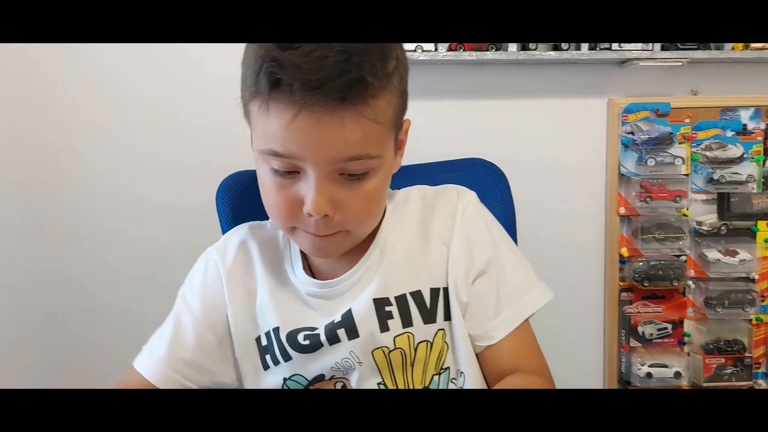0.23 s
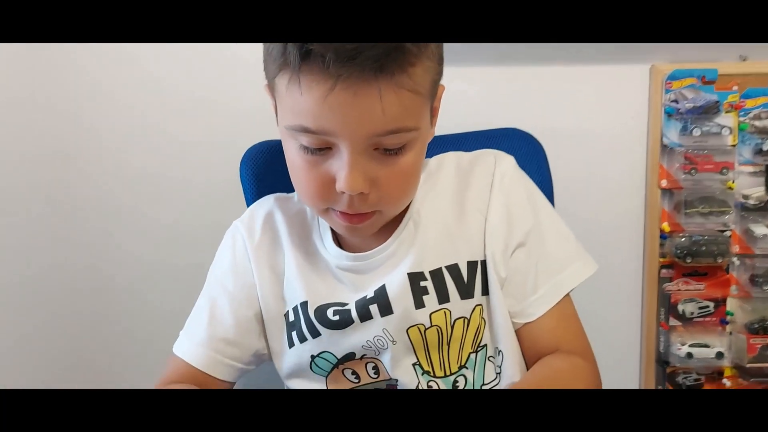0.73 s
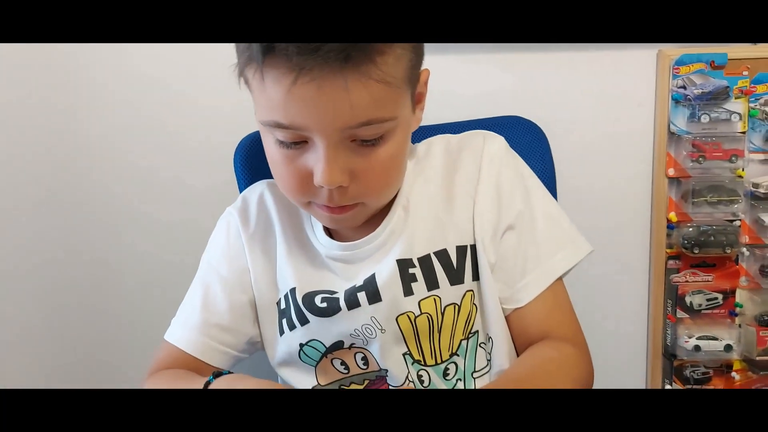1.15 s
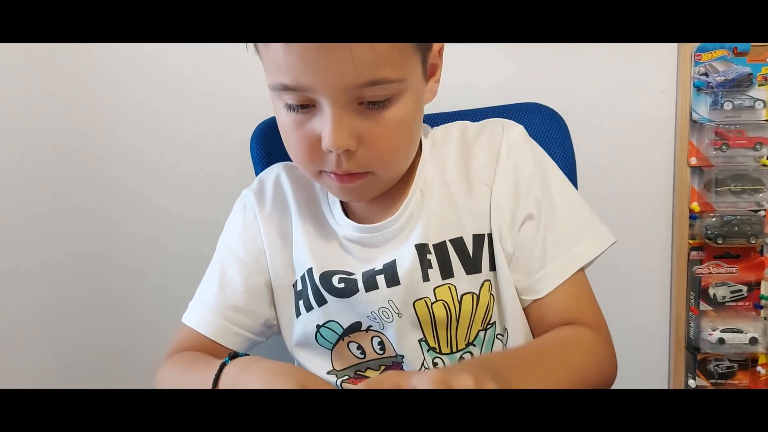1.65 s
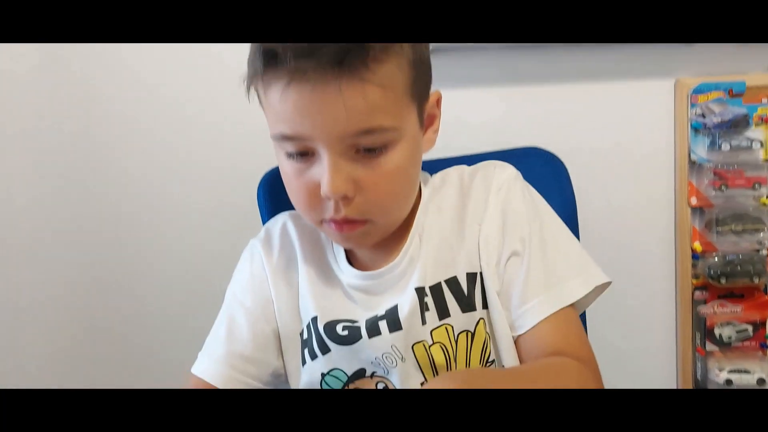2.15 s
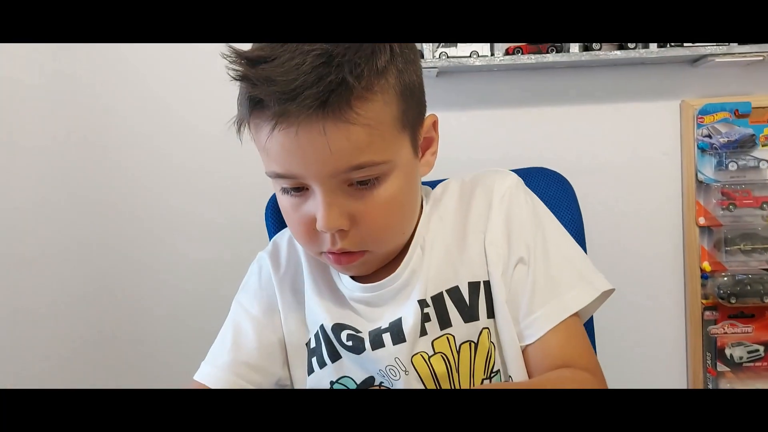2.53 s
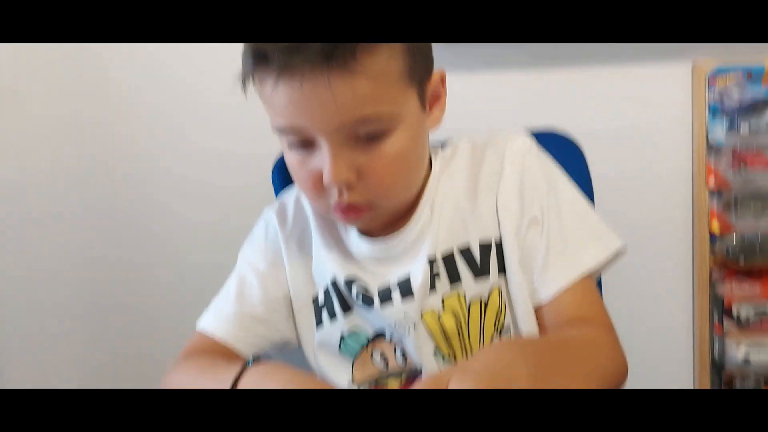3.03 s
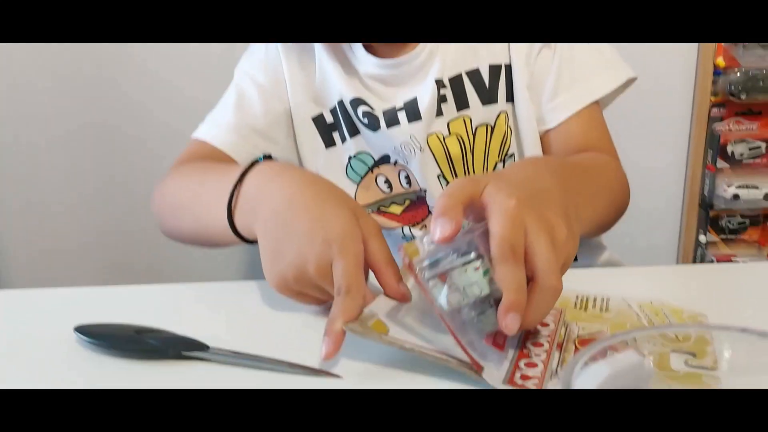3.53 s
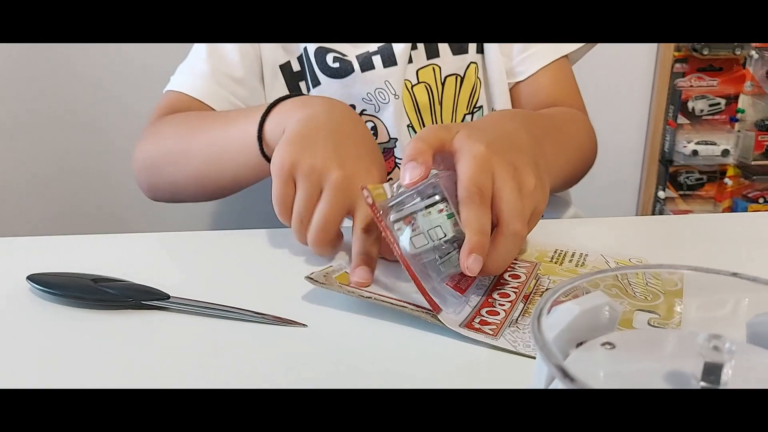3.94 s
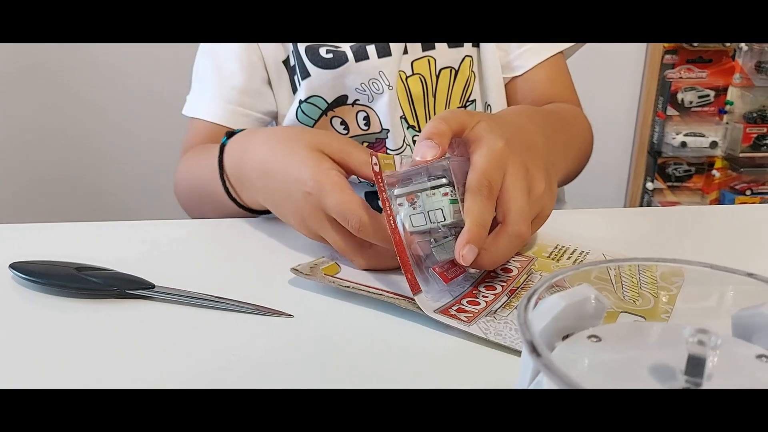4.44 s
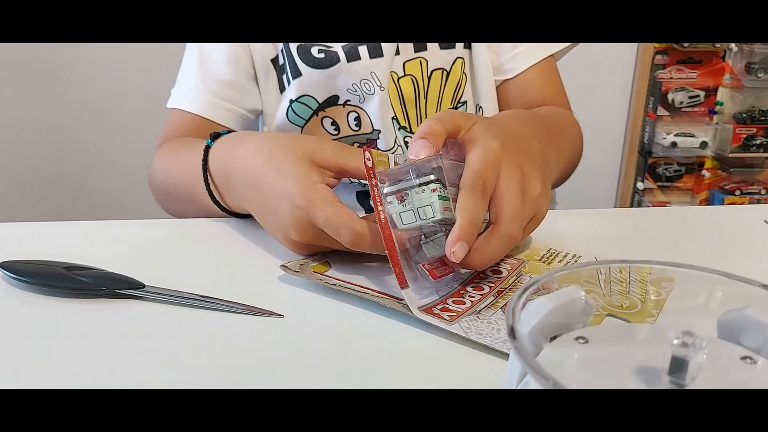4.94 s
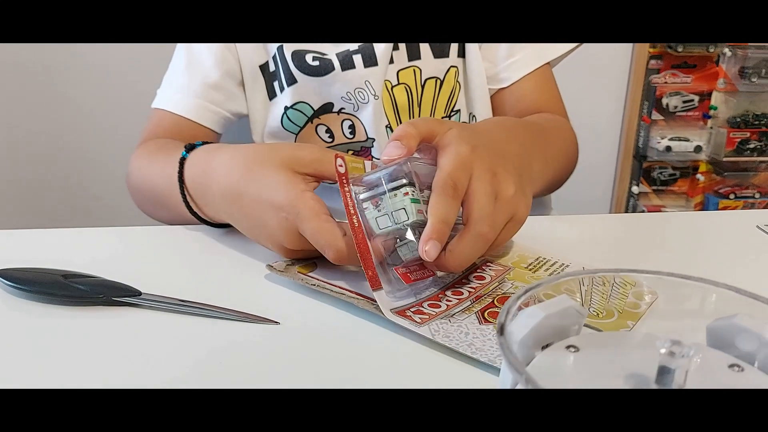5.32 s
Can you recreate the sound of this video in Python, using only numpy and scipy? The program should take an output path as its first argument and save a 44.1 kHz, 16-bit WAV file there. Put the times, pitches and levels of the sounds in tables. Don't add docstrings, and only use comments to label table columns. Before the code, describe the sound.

A brief metallic clatter on a tabletop gives way to irregular hollow plastic snaps over fine creaking and fizzing, close up in a quiet room.

```python
import sys
import numpy as np
from scipy import signal
from scipy.fft import rfft, irfft, next_fast_len
from scipy.io import wavfile

SR = 44100
rng = np.random.default_rng(int(sys.argv[2]) if len(sys.argv) > 2 else 0)


def ratio(d):
    e = np.asarray(d, float) / 20
    return 10 ** e


def dump(signal):
    limited = np.clip(np.atleast_2d(signal).T, -1, 1)
    pcm = np.round(limited * 32767).astype(np.int16)
    wavfile.write(sys.argv[1], SR, pcm)


N = 246210


def unit(x):
    return x / np.sqrt(np.mean(x ** 2) + 1e-20)


def along(points, hz):
    point_hz, value = np.transpose(points)
    return np.interp(np.log(hz + 1), np.log(point_hz + 1), value)


def filtered(x, response):
    n = x.shape[-1]
    size = next_fast_len(n + 4096)
    spectrum = rfft(x, size) * response(np.fft.rfftfreq(size, 1 / SR))
    return irfft(spectrum, size)[..., :n]


def coloured(x, spectrum):
    return filtered(x, lambda hz: ratio(along(spectrum, hz)))


def placed(start_s, shapes):
    at = np.round(start_s * SR).astype(int)[:, None] + np.arange(shapes.shape[1])
    return np.bincount(at.ravel(), shapes.ravel(), N + SR)[:N]


def ringing(modes, start_s, level_db, attack_s, scatter_db):
    mode_hz, mode_db, t60_s = np.transpose(modes)[:, :, None]
    t = np.arange(SR // 3) / SR
    scatter = scatter_db * rng.standard_normal((len(start_s), len(modes)))
    strength = ratio(scatter + level_db[:, None])
    decay = ratio(mode_db - 60 * t / t60_s)
    rings = decay * np.sin(2 * np.pi * mode_hz * t) * (1 - np.exp(-t / attack_s))
    return placed(start_s, strength @ rings)


def flexes(pitch_hz, cycles, attack_s, count):
    t = np.arange(SR // 60) / SR
    draw = rng.standard_normal((len(pitch_hz), 2 * count))
    order = np.arange(count)
    mode_hz = pitch_hz[:, None] * np.exp(0.34 * draw[:, :count] * order / count)
    size = ratio(2.55 * draw[:, count:] - 2.1 * order)
    wave = np.einsum("ek,ekt->et", size, np.sin(2 * np.pi * mode_hz[..., None] * t))
    wave *= np.exp(-t * pitch_hz[:, None] / cycles) * (1 - np.exp(-t / attack_s)) ** 2
    return wave / np.abs(wave).max(1, keepdims=True)


# freq [Hz], left-right likeness [0-1]
LIKENESS = [(40, .9), (300, 0.86), (1500, 0.2), (5000, 0.28)]


def spread(pair):
    def mid_side_gain(hz):
        angle = np.arccos(np.clip(along(LIKENESS, hz), -1, 1)) / 2
        return np.array([np.cos(angle), np.sin(angle)])

    mid, side = filtered(pair, mid_side_gain)
    return np.array([mid + side, mid - side])


# freq [Hz], density [dB per Hz]
HUSH_SPECTRUM = [(15, -33), (25, -12.5), (149, -1), (270, -17.5), (335, -17), (659, -14), (2050, -18.5),
                 (5880, -25.5), (7510, -38), (12900, -29.5), (16000, -47.5)]


def hush():
    noise = coloured(rng.standard_normal((2, N)), HUSH_SPECTRUM)
    return ratio(-64) * unit(spread(noise))


# freq [Hz], t60 [s]
ROOM_DECAY = [(150, .3), (700, 0.19), (2000, 0.23), (5000, 0.25), (13000, 0.16)]


def room(x, gap_s, count):
    wet, step = np.zeros((2, N + SR)), N // count + 1
    for start in range(0, N, step):
        hz, t, z = signal.stft(rng.standard_normal((2, SR // 2)), SR, nperseg=256)
        decay = ratio(-60 * t / along(ROOM_DECAY, hz)[:, None])
        tail = spread(signal.istft(z * decay, SR, nperseg=256)[1])
        tail = np.pad(tail / np.linalg.norm(tail[0]), ((0, 0), (int(gap_s * SR), 0)))
        part = signal.fftconvolve(x[None, start:start + step], tail, axes=1)
        wet[:, start:start + part.shape[1]] += part
    return wet[:, :N]


# mode_hz [Hz], mode_db [dB], t60_s [s]
DESK_MODES = [(107.8, -7, 0.37), (139.2, -6, 0.2), (197.6, -1.5, 0.16), (226.3, -5.5, 0.29),
              (271.6, -6.5, 0.26), (341.1, -3, 0.28)]
# start_s [s], level_db [dB peak]
THUD_EVENTS = [(0.699, -48), (1.059, -55), (1.154, -48), (1.41, -50.5), (1.602, -41), (2.07, -41),
               (2.172, -44.5), (2.304, -33.5), (2.56, -35), (2.876, -50), (2.984, -48.5), (3.342, -47),
               (3.542, -52), (3.738, -46), (3.885, -27), (4.108, -42.5), (4.319, -58), (4.506, -50),
               (4.742, -46), (5.09, -51.5), (5.434, -41)]


def thuds():
    start_s, level_db = np.transpose(THUD_EVENTS)
    return ringing(DESK_MODES, start_s, level_db - 11.5, attack_s=0.0027, scatter_db=6)


# start_s [s], creak_db [dB], fizz_db [dB]
CRACKLE_LEVELS = [(0.0, -50, -42), (0.12, -35.5, -39), (0.25, -50, -53), (0.37, -43, -65),
                  (0.51, -73.5, -81), (0.64, -56, -64.5), (0.92, -59.5, -66), (1.1, -56, -60.5),
                  (1.24, -48.5, -71.5), (1.38, -61, -89.5), (1.52, -62, -88.5), (1.75, -47.5, -62.5),
                  (1.8, -53, -69), (1.91, -69.5, -87), (2.04, -60.5, -83), (2.16, -42, -69),
                  (2.41, -54.5, -70.5), (2.46, -53, -57), (2.58, -36.5, -48), (2.75, -69.5, -81),
                  (2.84, -42.5, -70), (2.97, -48, -44.5), (3.11, -41.5, -44), (3.22, -71, -73.5),
                  (3.34, -40, -54.5), (3.46, -64.5, -56.5), (3.59, -53, -52.5), (3.78, -48, -63.5),
                  (3.98, -64.5, -72), (4.18, -65.5, -56.5), (4.3, -47.5, -54.5), (4.37, -41.5, -45),
                  (4.43, -41, -50), (4.58, -49.5, -51.5), (4.79, -45.5, -65), (4.93, -41, -66),
                  (5.08, -47, -68), (5.24, -62, -74), (5.36, -54, -68), (5.58, -62, -75)]
# freq [Hz], density [dB per Hz]
CREAK_SPECTRUM = [(150, -45.5), (250, -22), (648, -1), (772, -7.5), (921, -5), (1230, -8), (1680, -1.5),
                  (5000, -18.5), (6500, -50), (11000, -120)]
# freq [Hz], density [dB per Hz]
FIZZ_SPECTRUM = [(1470, -19), (2500, -6), (3230, -11.5), (6010, -14), (7420, -16), (8660, -15),
                 (9890, -21.5), (12100, -21.5), (15200, -23.5), (16000, -38)]


def slips(rate_hz, size_db, life_s):
    happens = rng.random(N) < rate_hz / SR
    impulses = happens * ratio(size_db * rng.exponential(size=N)) * rng.standard_normal(N)
    grain = rng.standard_normal(200) * np.exp(-np.arange(200) / SR / life_s)
    return signal.fftconvolve(impulses, grain)[:N]


def crackle():
    start_s, creak_db, fizz_db = np.transpose(CRACKLE_LEVELS)
    t = np.arange(N) / SR
    creak = unit(coloured(slips(rate_hz=600, size_db=5.5, life_s=0.00066), CREAK_SPECTRUM))
    fizz = unit(coloured(slips(rate_hz=2500, size_db=5, life_s=0.00021), FIZZ_SPECTRUM))
    creak *= ratio(np.interp(t, start_s, creak_db) + 7)
    fizz *= ratio(np.interp(t, start_s, fizz_db) + 3.5)
    return ratio([[-1.8], [1.8]]) * (creak + fizz)


# start_s [s], level_db [dB peak], jingle_db (blades) [dB], knock_db (desk) [dB]
SCISSOR_CONTACTS = [(0.004, -45.5, -9.5, 7.5), (0.051, -5, -32.5, -19.5), (0.058, -6.5, -14.5, -35),
                    (0.074, -21.5, -42, -16), (0.117, -10, -35, -16), (0.123, -12, -24.5, -24.5),
                    (0.132, -6.5, -24.5, -29), (0.142, -19.5, -14, -17.5), (0.158, -16.5, -8.5, -9),
                    (0.171, -30.5, -17.5, -14), (0.278, -27.5, -16.5, -6.5), (0.313, -18.5, -24, -13),
                    (0.334, -30, -29, 2.5), (0.371, -32, -12, -13), (0.393, -24.5, -33, -10)]
# mode_hz [Hz], mode_db [dB], t60_s [s]
HANDLE_MODES = [(533, -10, 0.14), (820, -8, 0.17), (932, -0.5, 0.21), (1353, -9, 0.098), (1620, -14, 0.12),
                (1838, -5, 0.137), (1954, -3.5, 0.121), (2190, -14.5, 0.028), (2570, -14, 0.081),
                (3985, -15.5, 0.12), (4506, -14.5, 0.12)]
# mode_hz [Hz], mode_db [dB], t60_s [s]
BLADE_MODES = [(5300, -2.5, 0.081), (6430, -1.5, 0.085), (7560, -11.5, .3), (7600, 3, 0.18),
               (8200, 7.5, 0.065), (11430, 1, 0.075), (13000, -6, 0.17), (14500, -8, .15)]


def scissors():
    start_s, level_db, jingle_db, knock_db = np.transpose(SCISSOR_CONTACTS)
    pitch_hz = np.full(len(start_s), 1950.)
    clicks = flexes(pitch_hz, cycles=5.5, attack_s=0.00018, count=3)
    click = placed(start_s, ratio(level_db - 5)[:, None] * clicks)
    handle = ringing(HANDLE_MODES, start_s, level_db - 17, attack_s=0.00045, scatter_db=4)
    blades = ringing(BLADE_MODES, start_s, level_db + jingle_db - 12, attack_s=0.0001, scatter_db=7)
    desk = ringing(DESK_MODES, start_s, level_db + knock_db - 7, attack_s=0.0073, scatter_db=4)
    return ratio([[-2.5], [2.5]]) * (click + handle + blades) + desk


# start_s [s], level_db [dB peak], pitch_hz [Hz], crack_db [dB], pan_db (left-right) [dB]
SNAP_EVENTS = [(0.539, -29, 1480, -24, -7.5), (0.556, -31.5, 920, -14, -4), (0.583, -33, 1460, -25, -5),
               (0.673, -53, 554, -17, -2), (0.703, -26, 1060, -13.5, -8), (0.703, -27.5, 542, -13, -3.0),
               (0.834, -35.5, 1260, -24, -4), (0.855, -27.5, 2050, -22.5, -12), (0.896, -37, 1470, -22, -6),
               (0.954, -53, 969, -21, 0), (0.985, -49, 1040, -33, 6), (1.006, -43, 1520, -39, -5),
               (1.036, -42, 633, -23, -3.0), (1.057, -33, 1540, -19, -6), (1.139, -24.5, 1730, -35, -1),
               (1.154, -25.5, 983, -19, 1), (1.158, -25.5, 940, -8.5, -3.5),
               (1.251, -31, 2050, -17.5, -10.5), (1.292, -41.5, 1130, -24, -4),
               (1.329, -42.5, 1040, -27, -3.5), (1.396, -32, 1170, -16.5, -4),
               (1.414, -39.5, 910, -21, -4.5), (1.557, -34, 1050, -17, -2.5), (1.591, -35, 1740, -16, -3.5),
               (1.591, -27.5, 1130, -17, -1), (1.609, -30.5, 2070, -3, -4.5), (1.722, -38, 727, -25, -2),
               (1.741, -33.5, 910, -26, -2), (1.82, -35, 1770, -33, -7), (1.91, -47, 1090, -27, -4.0),
               (1.934, -20, 1030, -22, -2), (2.056, -45, 861, -32, 2), (2.064, -34.5, 1440, -47, -2),
               (2.075, -45.5, 500, -31, -1), (2.075, -30.5, 920, -30, -2), (2.111, -28.5, 1410, -24, -5),
               (2.174, -43.5, 766, -19, 4), (2.187, -38.5, 900, -13, -3.5), (2.206, -42, 834, -13, -1),
               (2.224, -29.5, 1230, -16.5, -11), (2.241, -31.5, 533, -14, 0.5),
               (2.259, -20.5, 936, -21.5, -2.0), (2.295, -35, 1130, -15, -6), (2.312, -19, 1080, -17.5, -2),
               (2.337, -22, 1534, -26.5, -6), (2.366, -37, 547, -14, -3.0), (2.407, -41, 1130, -26, -4.0),
               (2.424, -41, 1080, -27, -2.5), (2.442, -43, 1070, -15, -3.5), (2.461, -36, 1060, -15, -5.0),
               (2.475, -30.5, 1100, -11, -4.5), (2.487, -32, 895, -19, -2), (2.51, -26.5, 1100, -19, -2),
               (2.54, -21, 1170, -17, -2), (2.564, -12, 1066, -19, -4), (2.597, -22, 920, -14, -2.5),
               (2.611, -20.5, 1060, -19, -4.0), (2.653, -37, 942, -22, -3.0),
               (2.786, -28.5, 1075, -12, -4.0), (2.818, -30.5, 1000, -17.5, -2.5),
               (2.845, -39, 910, -8, -1), (2.886, -23, 2030, -15.5, -5.5), (2.905, -36, 1020, -21, -5),
               (2.925, -25, 1050, -13.5, -6), (2.958, -23.5, 1030, -23, -4.0), (2.978, -30.5, 880, -11, 4),
               (3.011, -27.5, 1080, -13, -10), (3.032, -19, 1094, -19, -2), (3.063, -29, 713, -7, -1),
               (3.087, -33, 665, -14, -1), (3.132, -34.5, 2060, -20, -4.0), (3.246, -32.5, 1960, -13, -7),
               (3.274, -52, 2110, -16, -3.5), (3.296, -41.5, 2100, -15, -10),
               (3.334, -20.5, 2060, -17.5, -4.5), (3.408, -32.5, 1140, -14, -6),
               (3.491, -46, 2680, -12, -7), (3.552, -19, 1476, -22, -20.5), (3.553, -6, 1870, -29, -3),
               (3.74, -29, 1560, -15, -8), (3.819, -35, 1530, -29, -10), (3.89, -41, 1900, -20, -12.5),
               (3.89, -22.5, 1720, -15, -4), (3.986, -41.5, 2050, -15, -6.5), (4.119, -24, 1710, -21, -4),
               (4.14, -33.5, 2130, -22, -5.0), (4.183, -27, 1760, -15.5, -6),
               (4.212, -29, 2660, -13.5, -9.5), (4.257, -25.5, 1810, -20, -9.5),
               (4.281, -25.5, 1830, -22, -10), (4.303, -39, 2020, -23, -5.5), (4.319, -14, 1980, -27, -7),
               (4.34, -39, 1800, -24, -3.5), (4.357, -23.5, 2710, -22, -8), (4.406, -30, 1820, -20, -8),
               (4.432, -17.5, 1074, -30, 0), (4.477, -28.5, 2140, -13, -5), (4.492, -15, 2106, -26, -11.5),
               (4.523, -30, 1600, -16, -7), (4.545, -29, 1650, -18, -9), (4.572, -26, 1970, -23, -12.5),
               (4.605, -32.5, 1710, -29, -12), (4.654, -35, 1640, -29, -6.5), (4.678, -43, 1980, -18, -11),
               (4.69, -33, 1700, -17.5, -9), (4.749, -35, 1840, -13, -7), (4.764, -25, 1780, -18, -7),
               (4.778, -28, 1810, -11, 4), (4.795, -25.5, 1800, -15, -11), (4.816, -26.5, 895, -13, -1),
               (4.843, -34, 950, -18, -7), (4.873, -28, 924, -11, -2), (4.912, -29, 1190, -22, -4.0),
               (4.964, -25, 1600, -18, -6.5), (4.975, -4, 2120, -31, -7.5), (5.097, -23.5, 1510, -19, -8.5),
               (5.139, -44, 1450, -27, 0), (5.223, -45, 910, -30, -5.0), (5.248, -37, 720, -14, -4),
               (5.265, -27, 1160, -19.5, -5), (5.32, -32, 1960, -17, -3), (5.346, -16, 1100, -12.5, -4),
               (5.371, -33, 1070, -19, -9), (5.412, -40, 1100, -22, -2), (5.44, -21, 1000, -39, -9.5),
               (5.509, -29, 1710, -24, -5.5), (5.512, -28, 1680, -24, -8)]


def snaps():
    start_s, level_db, pitch_hz, crack_db, pan_db = np.transpose(SNAP_EVENTS)
    body = flexes(pitch_hz, cycles=2.96, attack_s=0.00029, count=4)
    t = np.arange(body.shape[1]) / SR
    crack = coloured(rng.standard_normal(body.shape) * ratio(-60 * t / 0.025), FIZZ_SPECTRUM)
    crack /= np.abs(crack).max(1, keepdims=True)
    wave = body + ratio(crack_db + 11.45)[:, None] * crack
    wave *= ratio(level_db + 0.42)[:, None]
    left = placed(start_s - 0.0005, wave * ratio(pan_db / 2)[:, None])
    right = placed(start_s - 0.0005, wave * ratio(-pan_db / 2)[:, None])
    return np.array([left, right])


def scene():
    near = scissors() + snaps() + crackle() + thuds()
    lead_s = np.array([[-1], [1]]) * 3.2e-5
    direct = filtered(near, lambda hz: np.exp(2j * np.pi * hz * lead_s))
    reverb = ratio([[-5.5], [-4.5]]) * room(near.mean(0), gap_s=0.004, count=24)
    return direct + reverb + hush()


def roll_off(x):
    return signal.sosfilt(signal.butter(12, 16810, fs=SR, output="sos"), x)


def record(dry):
    return roll_off(dry)


dry = scene()
out = record(dry)
dump(out)
```